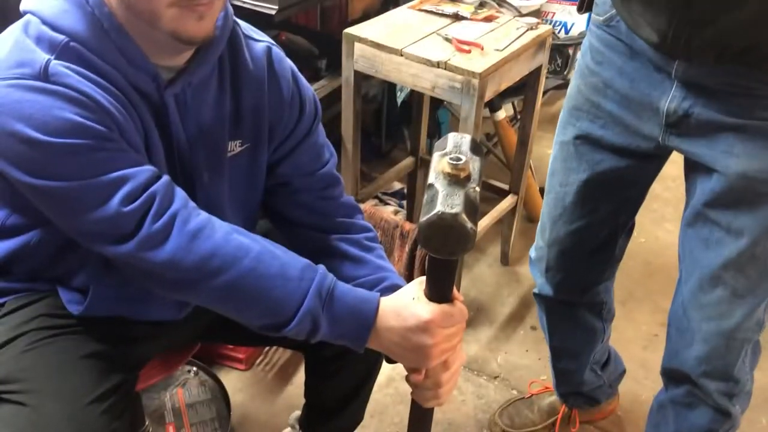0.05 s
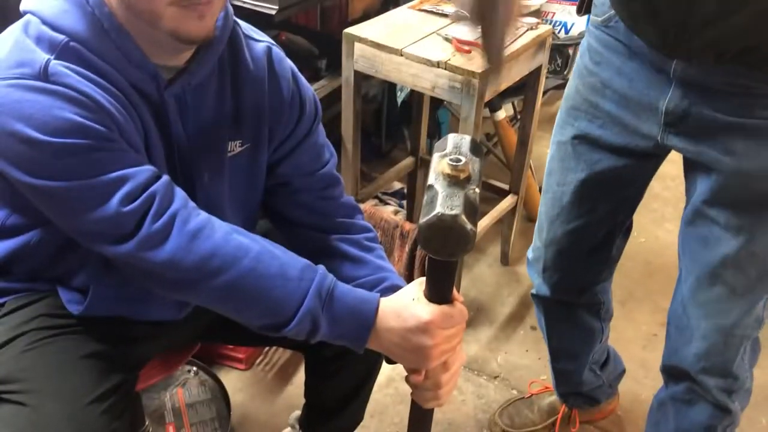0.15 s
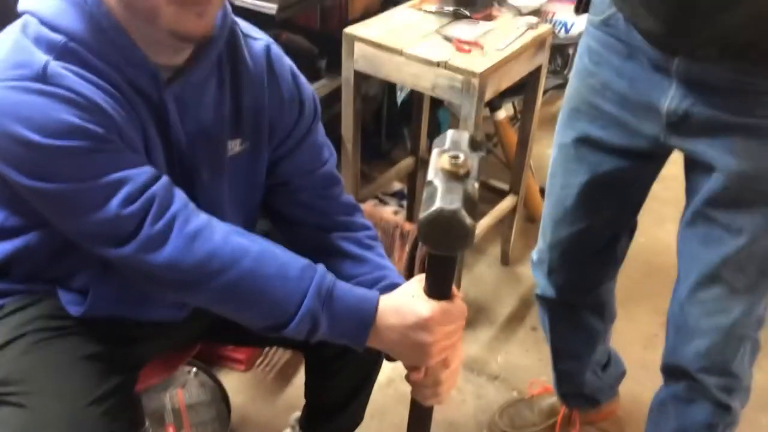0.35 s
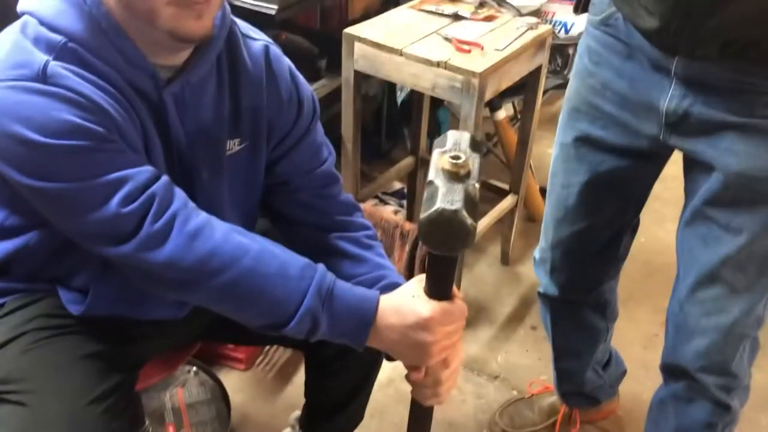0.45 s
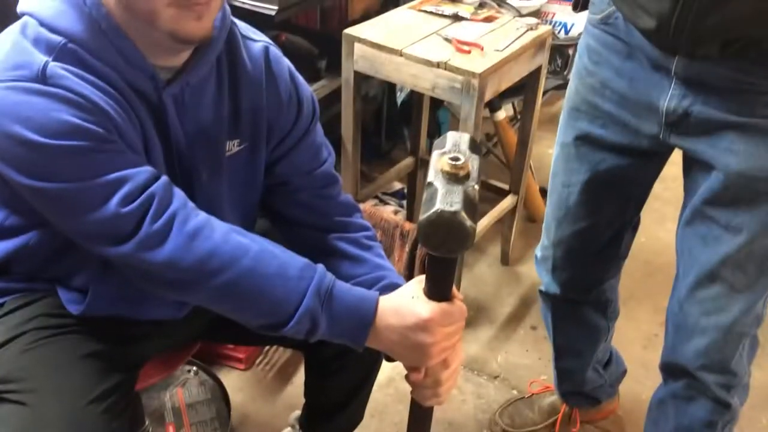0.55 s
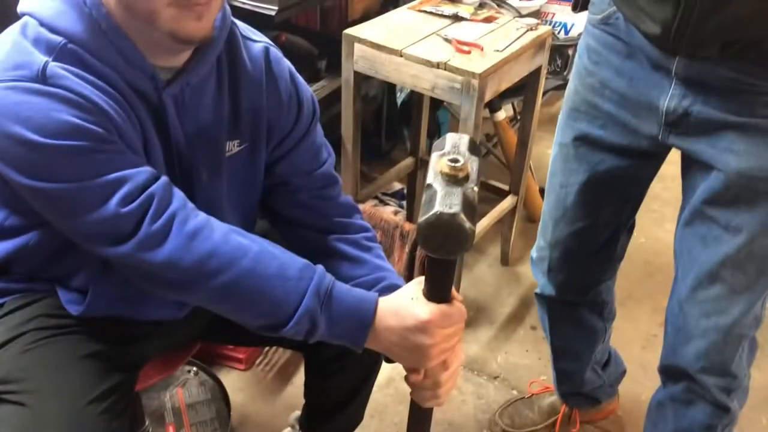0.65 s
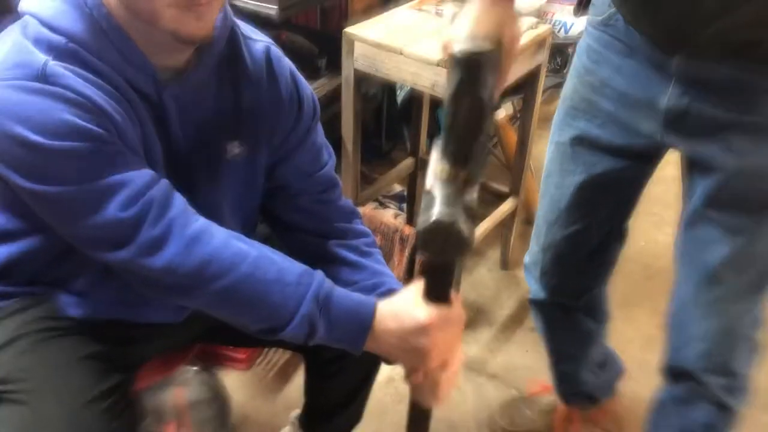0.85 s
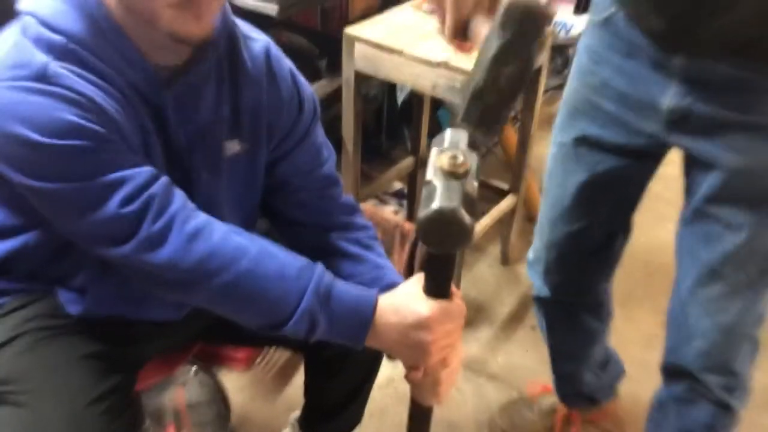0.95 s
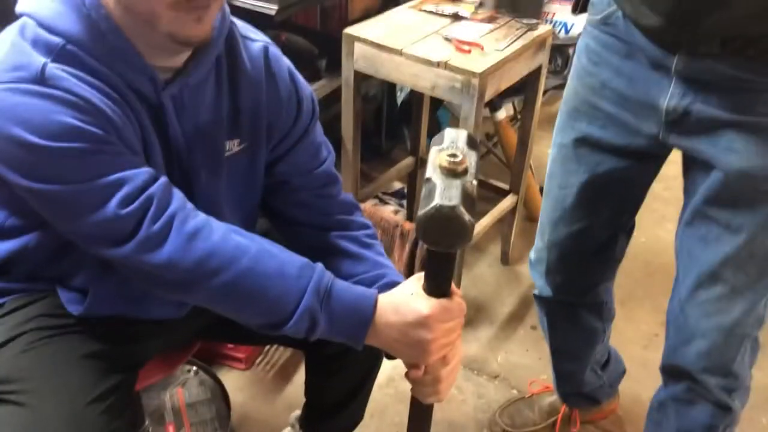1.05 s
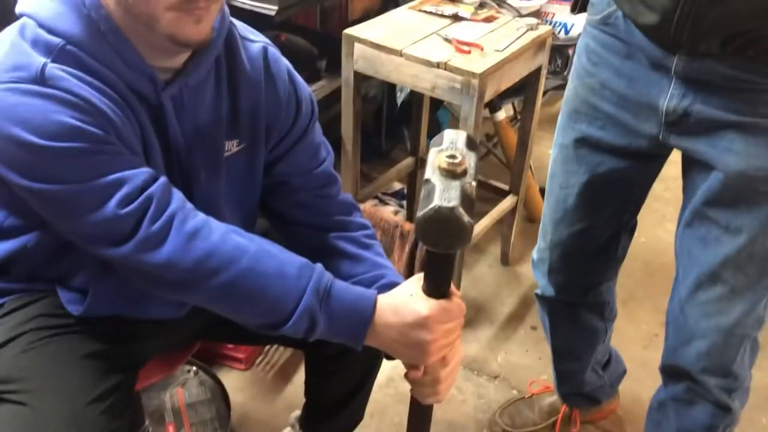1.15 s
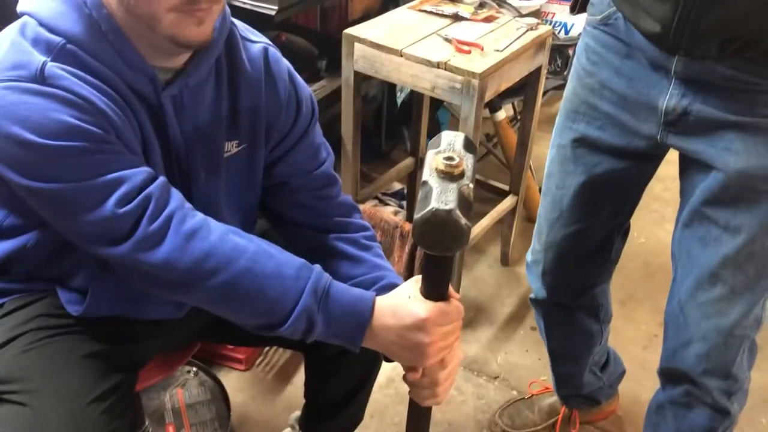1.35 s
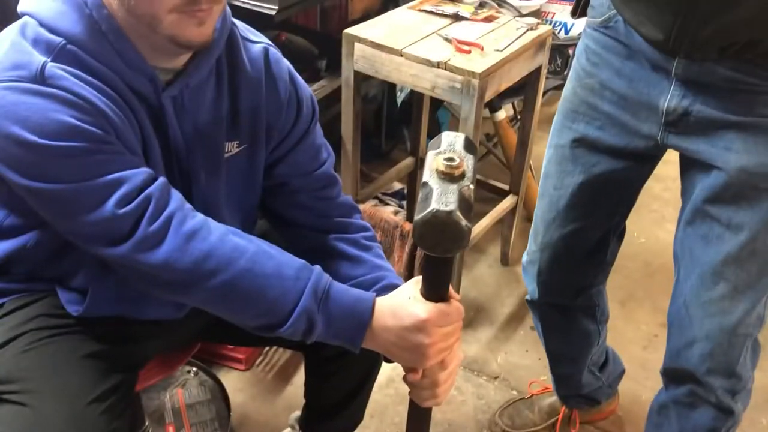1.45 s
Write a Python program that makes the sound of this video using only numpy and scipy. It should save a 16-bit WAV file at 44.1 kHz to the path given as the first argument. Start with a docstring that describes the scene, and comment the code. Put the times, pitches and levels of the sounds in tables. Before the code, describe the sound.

Close, slightly clipped hammer strikes on steel, two in all, about two thirds of a second apart; each has a dull handle thump, short room wash and tiny metallic rattles over faint rumble and hiss.

```python
"""On a workshop floor, a hammer twice strikes a steel wedge in a sledge head, close to the microphone.
Each blow cracks as noise and rings as dying sines; a moment later the handle thuds into the floor.
The room answers with sparse decaying reflections and the loudest peaks overload the microphone input.
Small metallic rattles follow each blow, and a faint tick comes near the end.
Low rumble, hiss and faint steady tones lie under it all."""
import sys
import numpy as np
from scipy import signal
from scipy.fft import rfft, irfft
from scipy.io import wavfile
from scipy.ndimage import uniform_filter1d

SR = 44100
rng = np.random.default_rng(int(sys.argv[2]) if len(sys.argv) > 2 else 0)


def file_out(sig):
    """Save sig as 16-bit WAV at sys.argv[1]."""
    # one column per channel
    cols = np.atleast_2d(sig).T
    # limit, then scale
    lim = np.clip(cols, -1, 1)
    pcm = np.round(lim * 32767).astype(np.int16)
    wavfile.write(sys.argv[1], SR, pcm)


def invert_db(level):
    """Linear amplitude ratio for a level in decibels (20 dB per decade), elementwise."""
    return 10 ** (np.asarray(level, dtype=float) / 20)


N = 66150


def read(points, hz):
    """Reads a table at any frequency, in straight lines over log frequency."""
    f, value = np.transpose(points)
    return np.interp(np.log(hz + 1), np.log(f + 1), value)


def evened(x):
    """Scales x to an rms of 1."""
    return x / np.sqrt(np.mean(x ** 2) + 1e-20)


def add(mix, start_s, sound):
    """Lays a sound into the mix, cut off at the end of the mix."""
    part = mix[round(start_s * SR):][:len(sound)]
    part += sound[:len(part)]


def coloured(x, points):
    """Shapes x by a spectrum."""
    hz = np.fft.rfftfreq(len(x), 1 / SR)
    return irfft(rfft(x) * invert_db(read(points, hz)), len(x))


def ring(modes):
    """One second of dying sines, all set off together."""
    t = np.arange(SR) / SR
    return sum(invert_db(db - 60 * t / t60) * np.sin(2 * np.pi * hz * t) for hz, db, t60 in modes)


# Modes of the steel head and wedge: (frequency [Hz], level [dB], t60 [s])
STEEL_MODES = [(1627, -7, 0.033), (2797, -21, 0.07), (3142, -27.5, .1), (3570, -2.5, 0.021),
               (4118, -21, .05), (4297, -11.5, 0.038), (6300, -17.5, 0.033), (7760, -25, 0.058),
               (8830, -31, 0.31), (9620, -8, 0.049), (11140, -45, .15)]
# Faint partials that ring on: (frequency [Hz], level [dB], t60 [s])
LATE_PARTIALS = [(2105, -47, .55), (2380, -47, .55), (2713, -41, .55), (3300, -48, .8), (3709, -49, .75),
                 (4032, -47, .7), (4204, -48, .8), (5055, -51, .5), (5572, -53, .45), (8740, -45, .33),
                 (13200, -55, .24)]
WAVER_DEPTH, WAVER_SMOOTH_S, WAVER_GROW_S = 0.35, 0.012, 0.13


def steel():
    """Each mode dies away while its strength wanders at random, as if close partials beat."""
    modes = STEEL_MODES + LATE_PARTIALS
    hop = 64  # samples between wander points
    wander = rng.standard_normal((len(modes), SR // hop + 1))
    wander = uniform_filter1d(wander, max(round(WAVER_SMOOTH_S * SR / hop), 1), axis=1)
    sample = np.arange(SR)
    depth = WAVER_DEPTH * np.minimum(sample / SR / WAVER_GROW_S, 1)
    sound = np.zeros(SR)
    for mode, w in zip(modes, wander):
        drift = np.interp(sample / hop, np.arange(len(w)), evened(w))
        sound += ring([mode]) * (1 - depth / 2 + depth * drift)
    return sound


# Spectrum of the faces meeting: (frequency [Hz], relative level [dB per Hz])
CRACK_SPECTRUM = [(500, -16.5), (1200, -3.5), (2500, -3.5), (3840, -13), (6490, -5), (9730, -8),
                  (11900, -19), (14800, -21), (17000, -42.5)]
CRACK_DB, CRACK_T60_S = -6.5, 0.04  # rms level before the decay


def crack():
    """A burst of coloured noise as the faces meet, dying exponentially."""
    t = np.arange(SR // 8) / SR
    noise = evened(coloured(rng.standard_normal(len(t)), CRACK_SPECTRUM))
    return invert_db(CRACK_DB - 60 * t / CRACK_T60_S) * noise


# Booming of handle, floor and room: (frequency [Hz], level [dB], t60 [s])
THUD_MODES = [(38.56, -20, 0.55), (60.16, -29, .45), (77.47, -26, 0.43), (86.77, -18.5, 0.53),
              (101.8, -16, .22), (179, -10, 0.18), (221.6, -4.5, .08), (249.1, -10.5, 0.21),
              (293.3, -14, 0.16), (325, -6.5, 0.068), (372, -25, 0.29), (417, -20.5, 0.16),
              (487.5, -24, 0.26), (555, -25.5, 0.11), (657.5, -19.5, 0.19)]
THUD_RISE_S = 0.0025


def thud():
    """The floor is pushed down, so the low modes start negative and swell in briefly."""
    rise = np.minimum(np.arange(SR) / SR / THUD_RISE_S, 1)
    return -ring(THUD_MODES) * rise


# Decay of the room: (frequency [Hz], t60 [s])
ROOM_DECAY = [(40, 0.59), (90, .6), (170, 0.56), (280, 0.4), (500, .4), (1100, 0.31), (2500, 0.31),
              (4000, 0.31), (6000, .33), (9000, 0.28), (11500, 0.1), (15000, 0.065)]
EARLY_DB, EARLY_SHARE = 1, 0.22  # early reflections: stronger, dying in this share of the t60


def room_tail():
    """Sparse taps of random sign, each band dying at its own speed; unit energy."""
    taps = np.zeros(SR)
    at = np.arange(20, SR - 8, 8)  # one tap at random in every 8 samples
    at = at + rng.integers(0, 8, len(at))
    taps[at] = rng.choice([-1., 1.], len(at))
    hz, t, bands = signal.stft(taps, SR, nperseg=256)
    fall_db = -60 * t / read(ROOM_DECAY, hz)[:, None]
    late = invert_db(fall_db)
    early = invert_db(EARLY_DB + fall_db / EARLY_SHARE)
    tail = signal.istft(bands * (late + early), SR, nperseg=256)[1][:SR]
    return tail / np.linalg.norm(tail)


# Colour of the room's answer: (frequency [Hz], relative level [dB per Hz])
ANSWER_SPECTRUM = [(24, -15), (40, -2), (90, -3), (140, -20), (250, -10), (450, -10), (800, -8),
                   (1500, -11), (2250, -15.5), (2800, -13), (4200, -12.5), (4600, -21.5), (9000, -23),
                   (11000, -38), (16000, -42.5), (17500, -70.5)]
ANSWER_DB = 17


def room_answer(impulses, tail):
    """The room's wash: each blow's impulse sets off the coloured tail."""
    padded = np.r_[tail, np.zeros(SR // 4)]  # keeps the filter from wrapping round
    tinted = coloured(padded, ANSWER_SPECTRUM)[:SR]
    wash = signal.oaconvolve(impulses, tinted / np.linalg.norm(tinted))[:N]
    return invert_db(ANSWER_DB) * wash


def room_echo(near, low, tail):
    """The direct sounds themselves, reflected by the uncoloured room tail."""
    near_db, low_db = -15, -12
    return signal.oaconvolve(invert_db(near_db) * near + invert_db(low_db) * low, tail)[:N]


# Small metallic rattles: (time [s], relative level [dB], time to fall 20 dB [s])
RATTLE_EVENTS = [(0.39, -62, 0.037), (0.419, -48, 0.079), (1.066, -55, 0.16)]
# Modes of the loose metal: (frequency [Hz], width [Hz], relative level [dB])
LOOSE_METAL = [(2090, 100, -6), (2360, 100, -6), (2710, 70, -1), (3710, 80, -6), (3950, 300, -3),
               (5050, 120, -9), (6130, 120, -12), (6760, 120, -13), (8400, 120, -17)]
CLICKS_PER_S, RATTLE_RISE_S = 2500, 0.0018


def rattles():
    """Clusters of tiny random clicks ring loose metal."""
    size = invert_db(2.5 * rng.exponential(1, N))
    happens = rng.random(N) < CLICKS_PER_S / SR
    clicks = size * happens * rng.choice([-1, 1], N)
    t = np.arange(N) / SR
    level = np.zeros(N)
    for start_s, db, length_s in RATTLE_EVENTS:
        rise = np.clip((t - start_s) / RATTLE_RISE_S, 0, 1)
        level += invert_db(db - 20 * np.clip(t - start_s, 0, 2) / length_s) * rise
    modes = [(hz, db, 2.2 / width) for hz, width, db in LOOSE_METAL]  # a wider mode dies sooner
    bit = ring(modes) * np.minimum(np.arange(SR) / 40, 1)  # onset over 40 samples
    return signal.oaconvolve(clicks * level, bit / np.linalg.norm(bit) * 2)[:N]


def tick():
    """A faint tick: one very short dying sine, starting negative."""
    return -ring([(1200, -41, 0.012)])  # frequency [Hz], level [dB], t60 [s]


# Workshop background: (frequency [Hz], relative level [dB per Hz])
BACKGROUND_SPECTRUM = [(12, -28), (20, 10), (134, -6), (146, -28.5), (177, -11), (277, -13.5), (410, -20.5),
                       (558, -16.5), (738, -19.5), (2080, -25), (3530, -30), (8650, -45), (16000, -66)]
BACKGROUND_DB, PATCHY_DB = -50, 0.6  # rms level; rms drift of the patches


def background():
    """Workshop rumble and hiss: noise whose level drifts in patches of time and frequency."""
    frames, hz = N // 512 + 5, np.fft.rfftfreq(2048, 1 / SR)
    real, imaginary, patches = rng.standard_normal((frames, 1025, 3)).T
    patches = uniform_filter1d(patches, 20, 0)  # over frequency
    patches = evened(uniform_filter1d(patches, 6, 1))  # over time
    level = invert_db(read(BACKGROUND_SPECTRUM, hz)[:, None] + PATCHY_DB * patches)
    noise = signal.istft((real + 1j * imaginary) * level, nperseg=2048, noverlap=1536)[1][:N]
    return invert_db(BACKGROUND_DB) * evened(noise)


# Faint steady tones: (frequency [Hz], level [dB])
STEADY_TONES = [(412, -68.5), (1670, -86)]


def steady_tones():
    """Sines that hold one level throughout."""
    t = np.arange(N) / SR
    return sum(invert_db(db) * np.sin(2 * np.pi * hz * t) for hz, db in STEADY_TONES)


# Hammer blows: (time [s], strength [dB])
HAMMER_BLOWS = [(0.2013, 0), (0.8754, 0)]
THUD_DELAY_S, ROOM_DELAY_S = 0.0038, 0.0037  # after each blow
TICK_S = 1.3112


def scene():
    """Sums the direct blows, the room's answer and echo, the small noises and the background."""
    near, low, impulses = np.zeros((3, N))
    for blow_s, db in HAMMER_BLOWS:
        add(near, blow_s, invert_db(db) * steel())
        add(near, blow_s, invert_db(db) * crack())
        add(low, blow_s + THUD_DELAY_S, invert_db(db) * thud())
        add(impulses, blow_s + ROOM_DELAY_S, invert_db(np.array([db])))
    add(near, TICK_S, tick())
    tail = room_tail()
    room = room_answer(impulses, tail) + room_echo(near, low, tail)
    mix = near + low + room + rattles() + background() + steady_tones()
    return mix[None]


def roll_off(x):
    """The treble ends steeply here."""
    return signal.sosfilt(signal.butter(12, 17140, fs=SR, output="sos"), x)


def record(dry):
    """The close microphone's input overloads with a firm knee, then the top is band-limited."""
    ceiling, knee = 0.72, 5.  # ceiling as amplitude; a higher knee bends later and harder
    clipped = dry / (1 + abs(dry / ceiling) ** knee) ** (1 / knee)
    lowpass = signal.firwin(255, 16700, fs=SR)  # edge in Hz
    limited = signal.oaconvolve(clipped, lowpass[None], "same")
    return roll_off(limited)


dry = scene()
out = record(dry)
file_out(out)
```